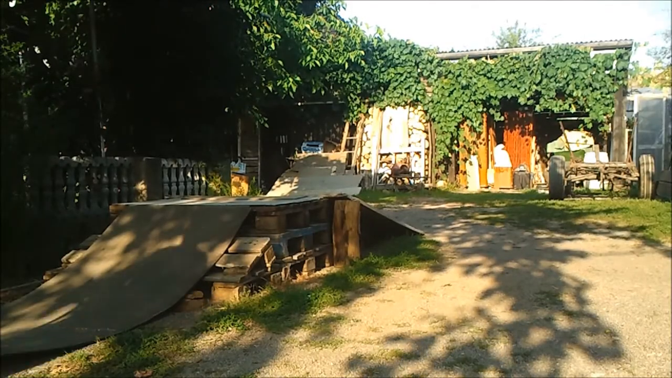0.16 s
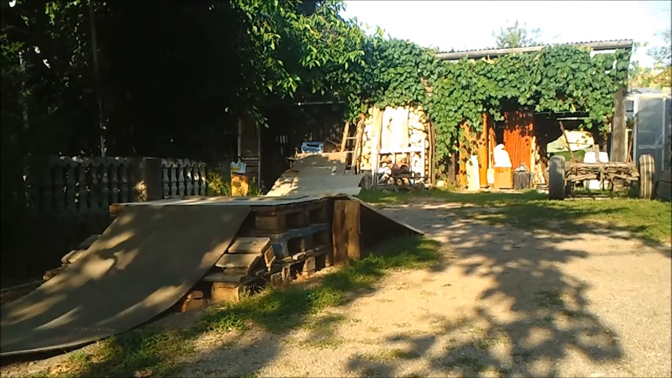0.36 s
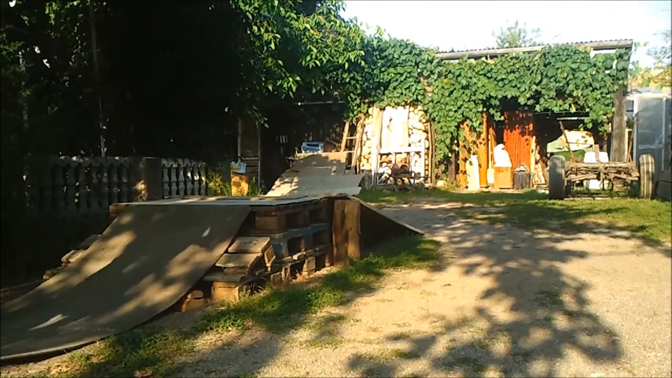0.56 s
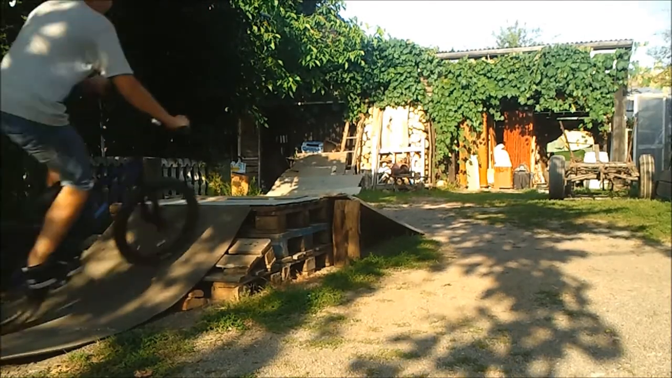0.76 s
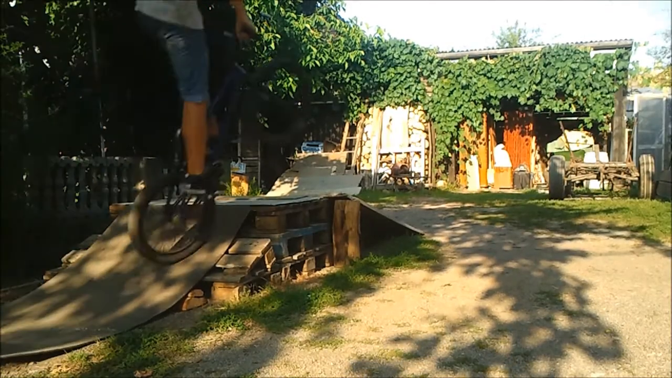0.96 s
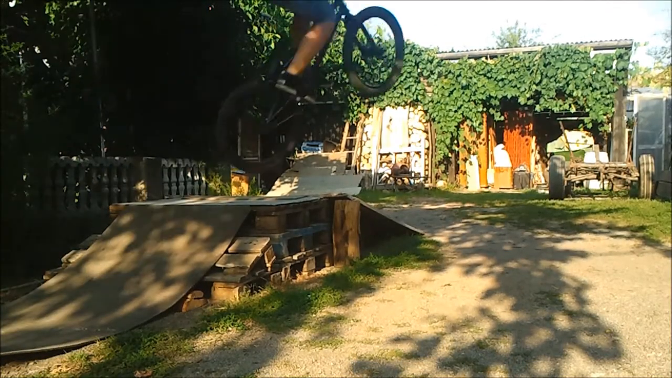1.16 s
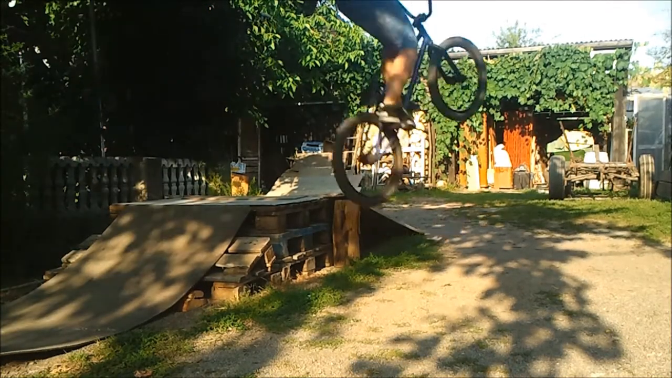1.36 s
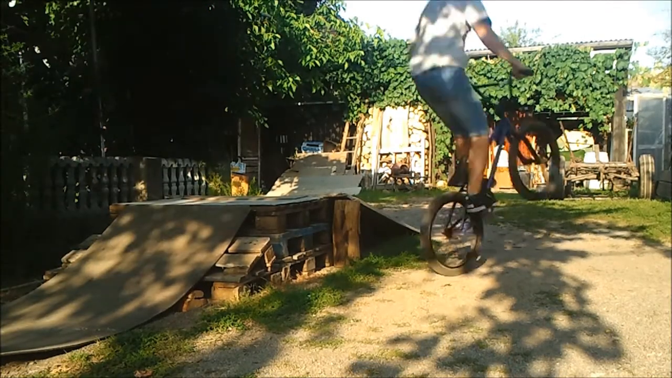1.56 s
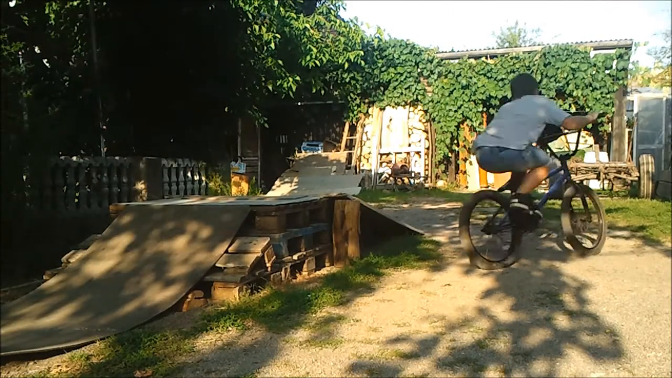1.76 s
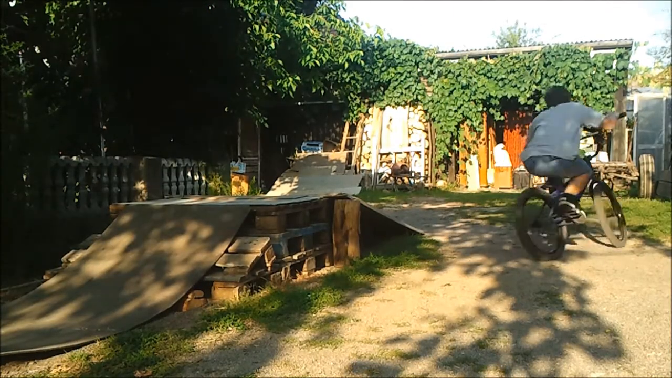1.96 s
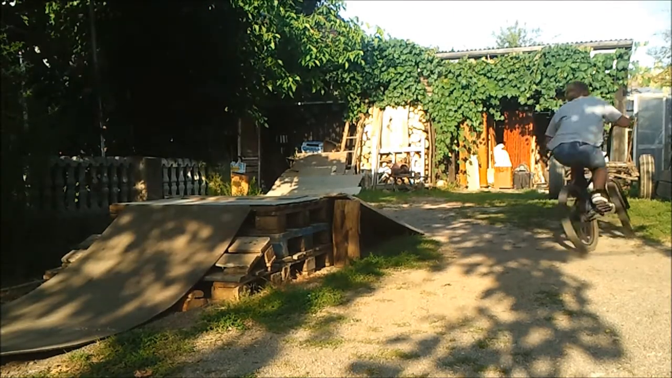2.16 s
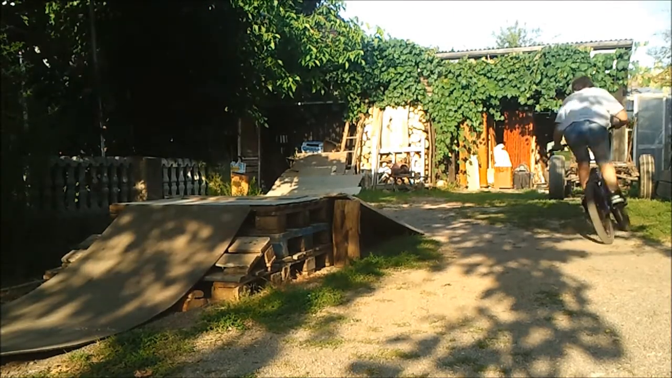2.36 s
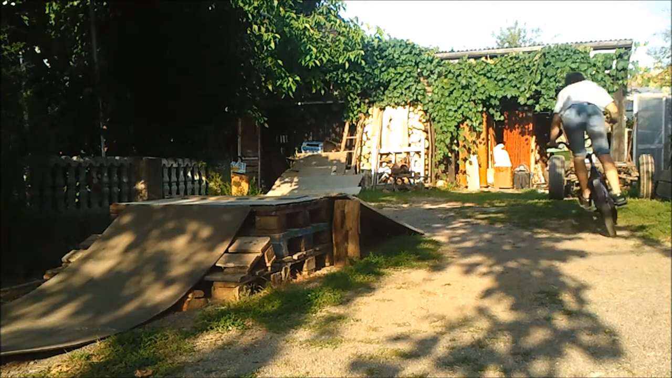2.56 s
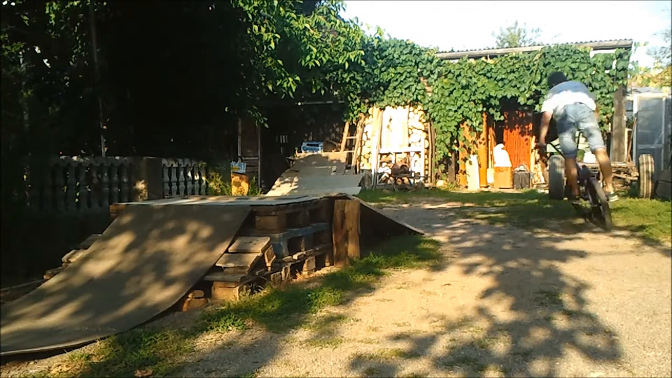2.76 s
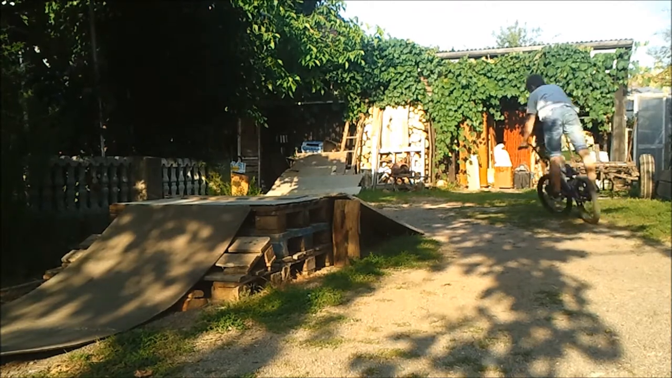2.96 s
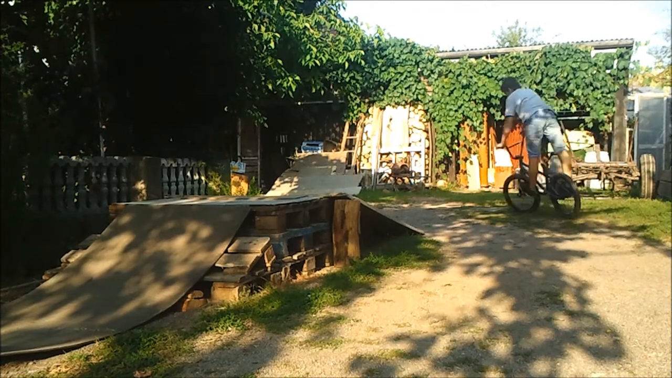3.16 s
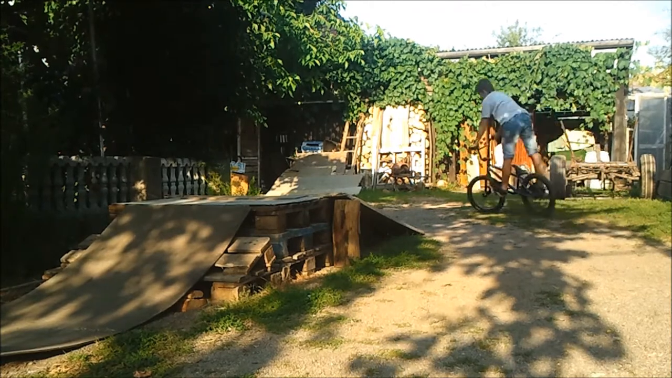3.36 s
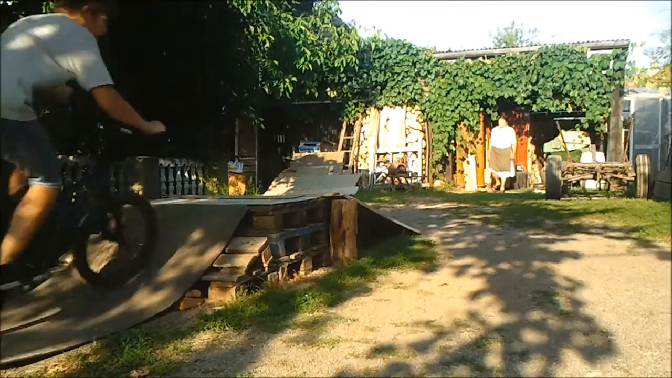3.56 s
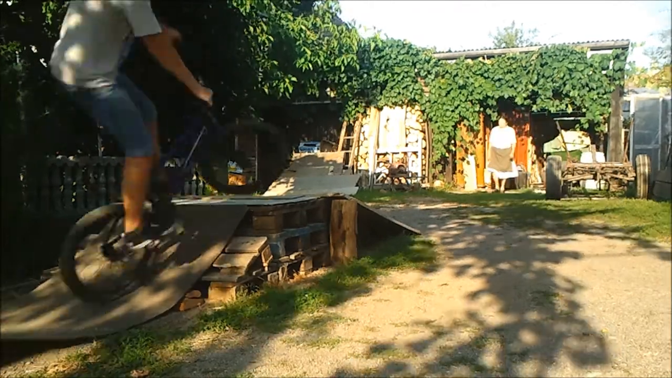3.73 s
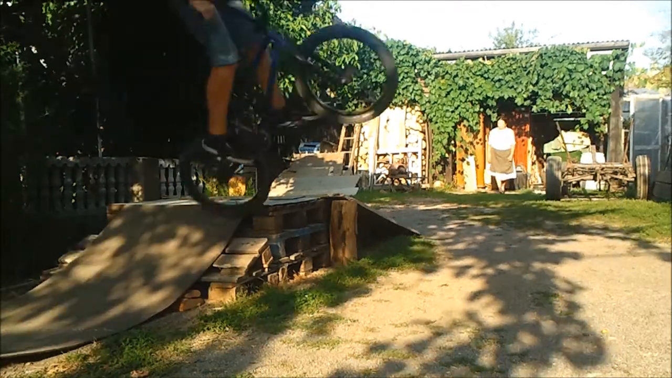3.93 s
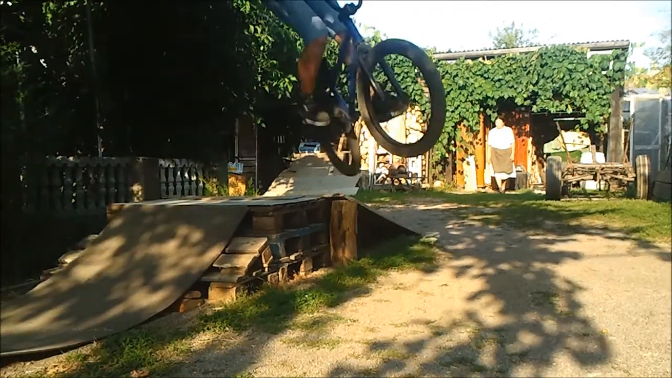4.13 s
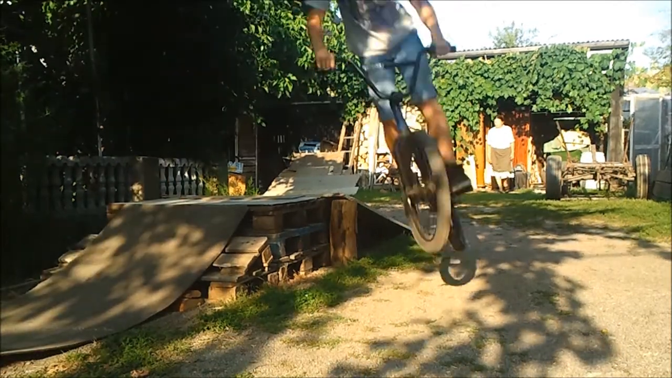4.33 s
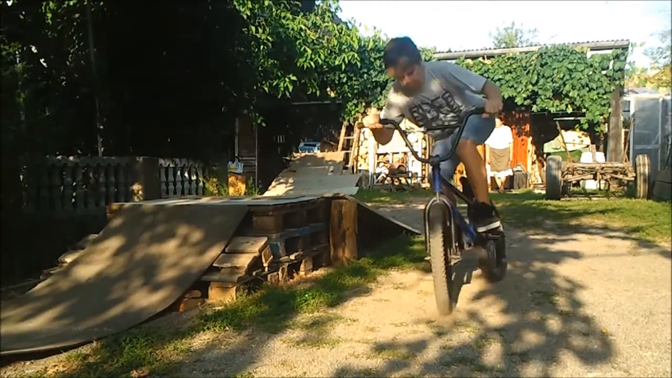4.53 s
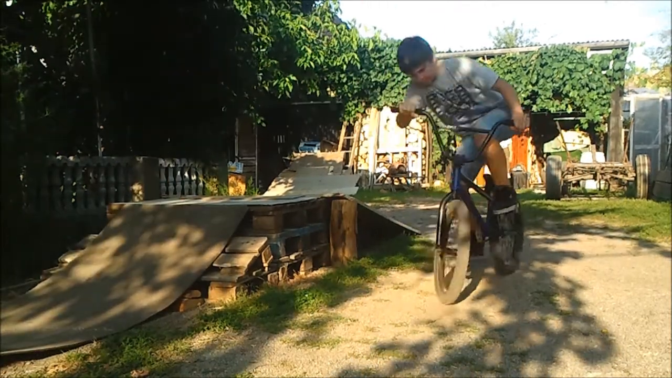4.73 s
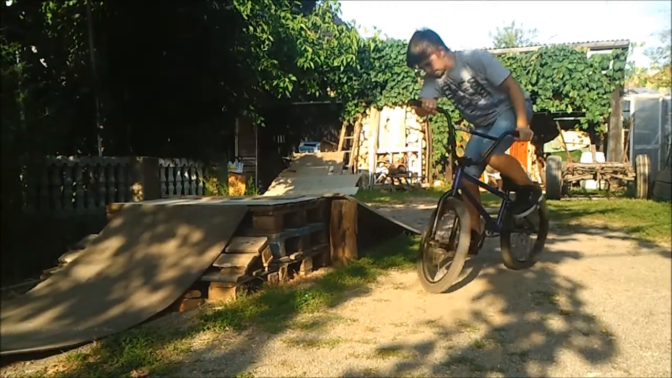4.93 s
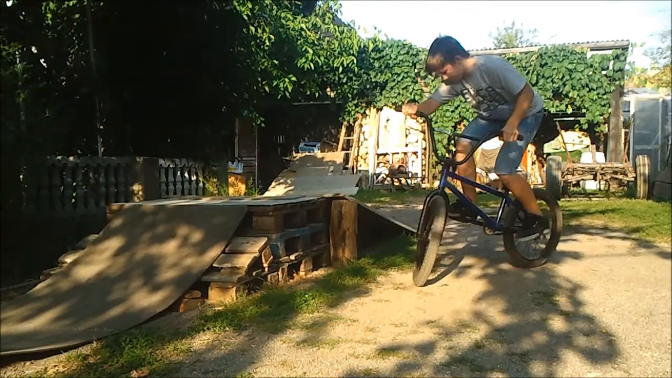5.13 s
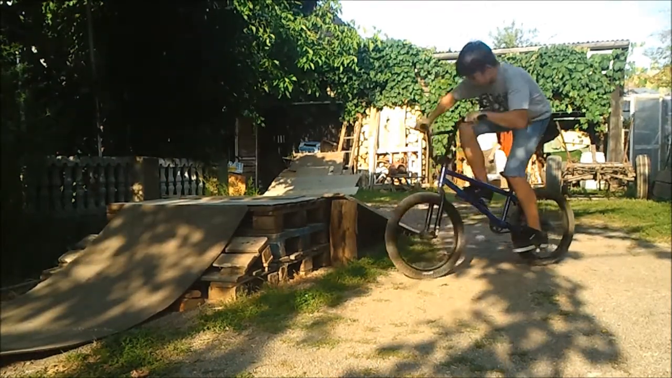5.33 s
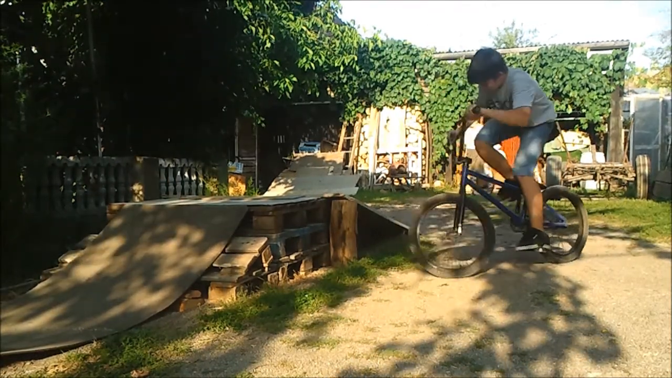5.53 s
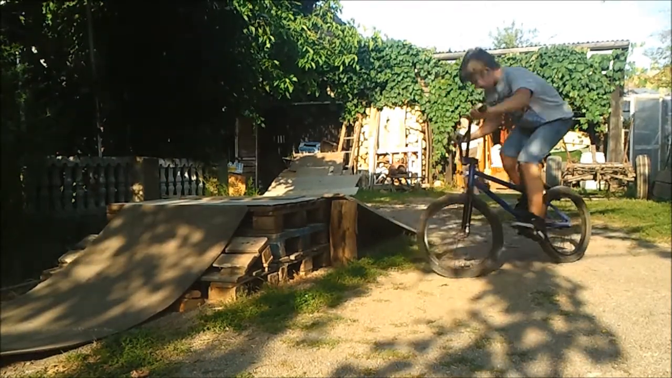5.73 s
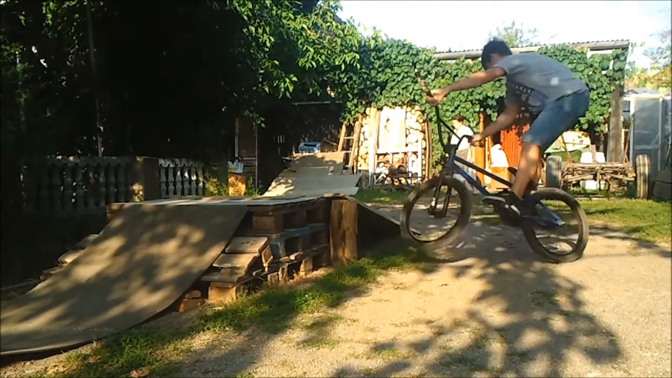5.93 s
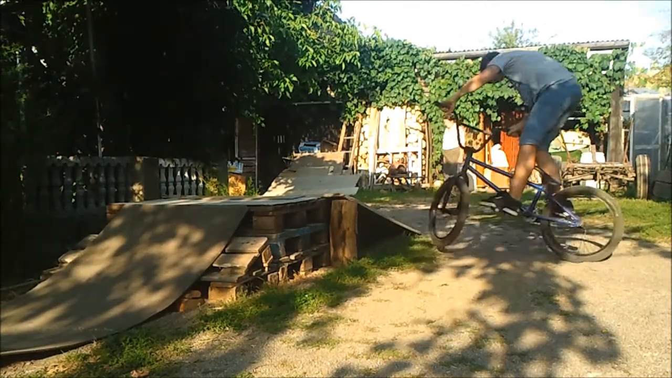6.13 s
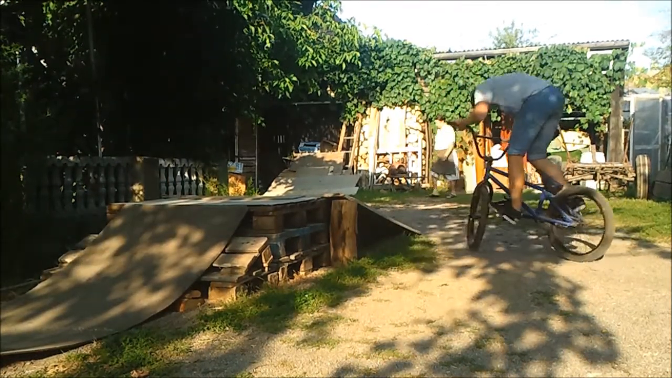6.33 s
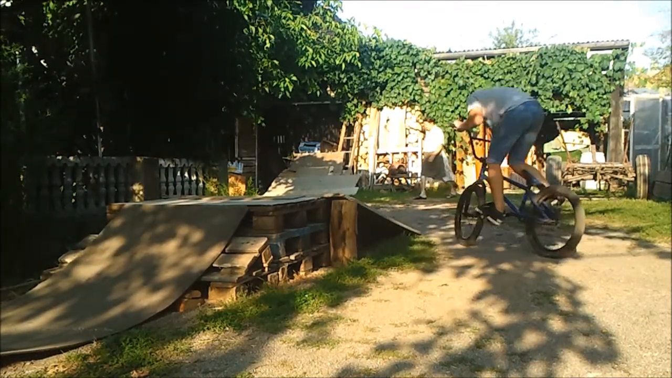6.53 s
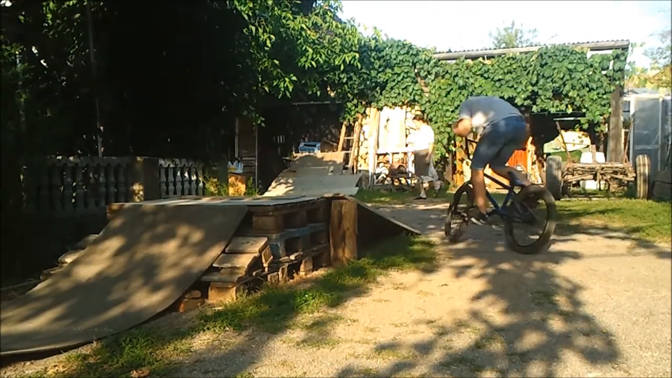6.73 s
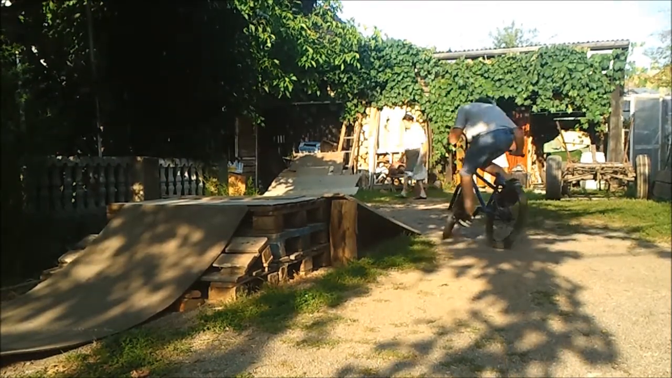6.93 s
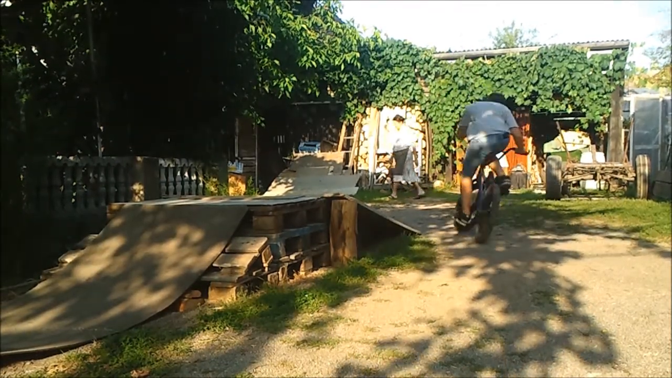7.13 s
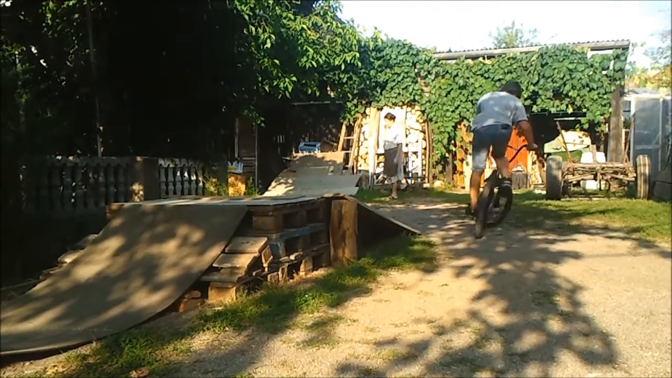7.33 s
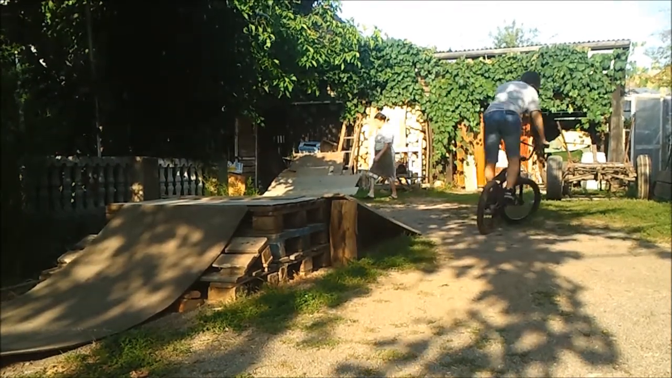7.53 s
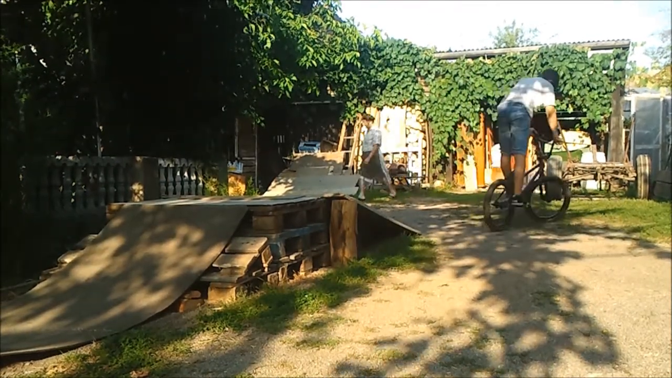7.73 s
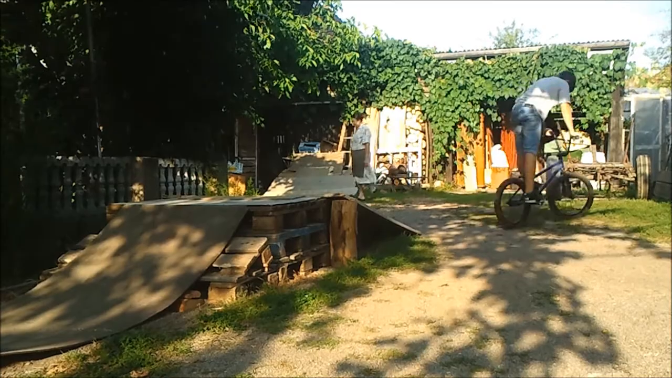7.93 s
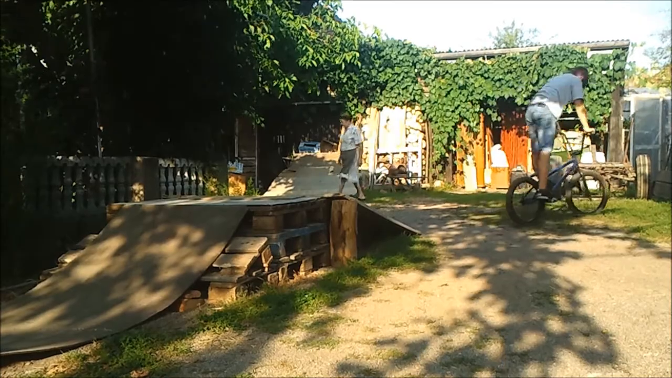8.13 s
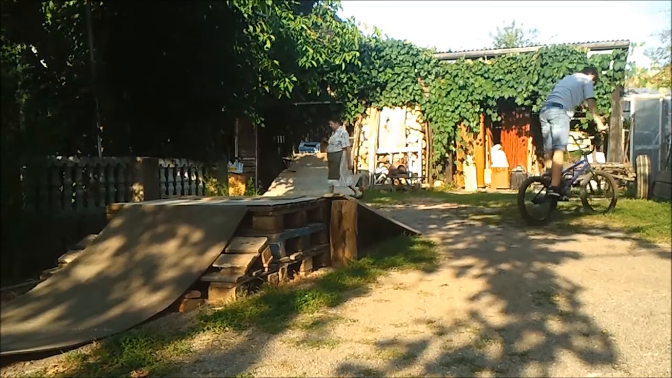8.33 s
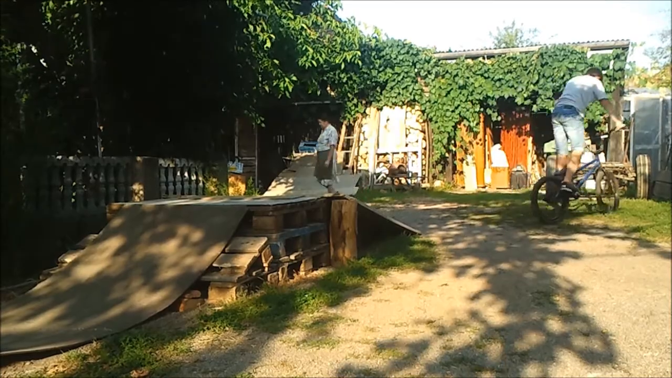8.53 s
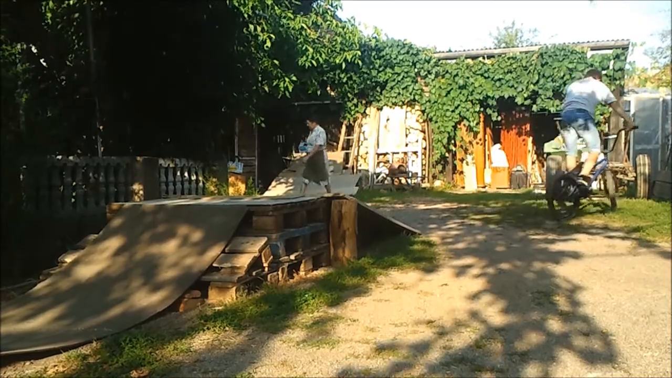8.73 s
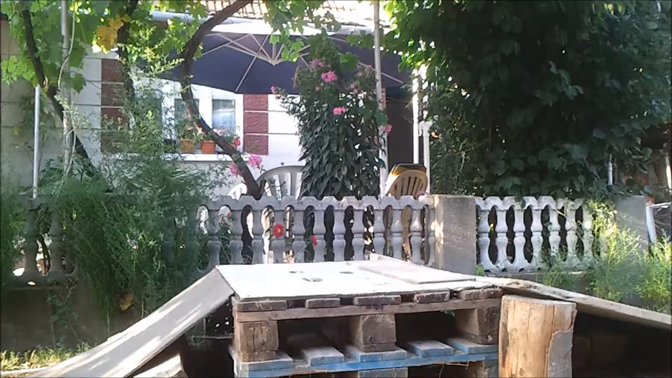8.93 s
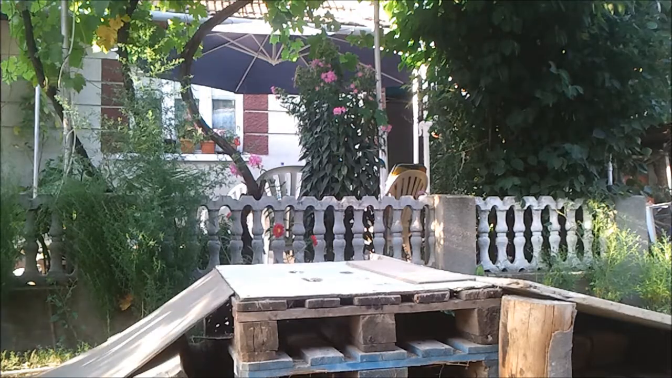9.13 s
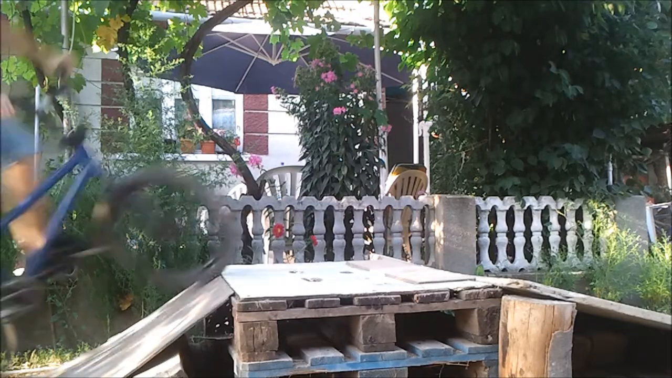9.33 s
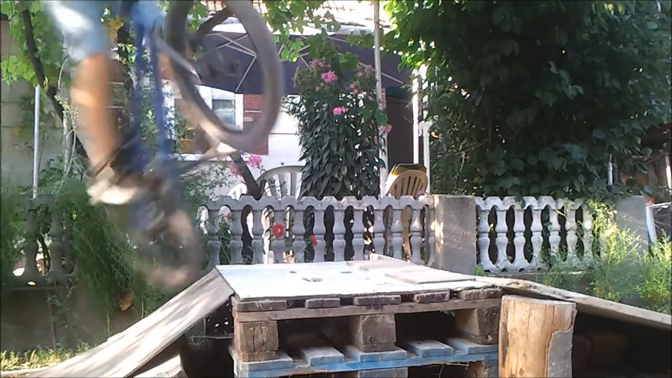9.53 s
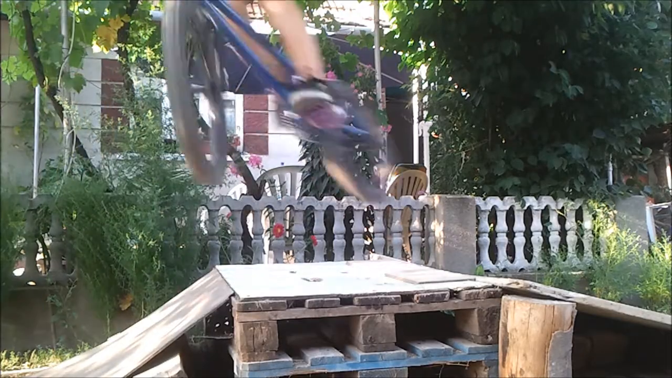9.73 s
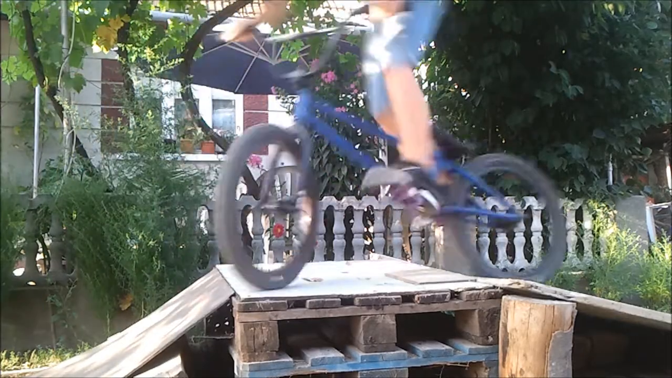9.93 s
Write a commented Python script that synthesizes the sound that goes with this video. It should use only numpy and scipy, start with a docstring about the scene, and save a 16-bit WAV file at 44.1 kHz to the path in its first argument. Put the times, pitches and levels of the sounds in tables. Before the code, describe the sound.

Three bicycle passes over a homemade plank ramp, heard close in the open air with a short soft reflection. Each begins with grinding tyres and snapping stones, then heavy hollow board knocks and loose slat rattle. Between rides come landing scuffs, metallic freewheel clicks slowing with the bike, small skids, and soft low wind thumps, over a very faint leafy rustle. The last pass slams loudest.

```python
"""A yard in the wind: a bicycle rolls over gravel and up a hollow plank ramp, three times.
Noise bursts and random impacts ring banks of resonances: boards drum and knock, freewheel ticks jangle.
Shaped grains of noise make the crunch of the tyres, short filtered cracks the snapping stones.
A few decaying sines ping like small steel parts. Lumpy low noise is the wind on the microphone, with the
ramp's low boom and the thud of landings; single low thumps and a faint steady rustle join it."""
import sys
import numpy as np
from scipy import signal
from scipy.fft import rfft, irfft, next_fast_len
from scipy.io import wavfile
from scipy.ndimage import map_coordinates

SR = 44100
rng = np.random.default_rng(int(sys.argv[2]) if len(sys.argv) > 2 else 0)


def transcribe(signal):
    """Save signal, clipped to [-1, 1], as a 16-bit WAV file at the path in sys.argv[1]."""
    frames = np.atleast_2d(signal).T
    limited = np.clip(frames, -1, 1)
    pcm = np.round(limited * 32767).astype(np.int16)
    wavfile.write(sys.argv[1], SR, pcm)


N = 440118  # length [samples]

# Wheels on the ramp, one table per ride: (time [s], drumming level [dB], rattle relative to drumming [dB])
RAMP_RIDES = [
    [(.3, -46, -6), (.69, -34, -4), (.72, -23, -13), (.9, -30, 1.5), (1.02, -18.5, -7.5), (1.2, -29, -5),
     (1.5, -38, -8.5)],
    [(3.555, -42, -11), (3.59, -29, -0.5), (3.68, -27, -4.5), (3.73, -21.5, -9.5), (3.9, -24.5, -2.5),
     (3.98, -21, -8), (4.16, -35, -0.5), (4.45, -46, -19)],
    [(8.95, -47, 1), (9.13, -22, -8), (9.29, -29, -3.5), (9.36, -17.5, -9), (9.62, -30, -2.5),
     (9.8, -28, -7), (9.97, -46, -5)],
]
# Knocks of boards and landings: (time [s], peak of the deck part [dB], slat part relative to it [dB])
BOARD_KNOCKS = [(0.706, -11.5, -4), (0.738, -22.5, -3.5), (0.879, -13, -6.5), (0.951, -12, 3.5),
                (0.975, -4, -6.5), (1.028, -5, -10.5), (1.048, -19, -18), (1.112, -18, 6),
                (1.127, -15.5, 5.5), (1.298, -15, -2.5), (1.929, -21, -7), (3.701, -10.5, -2.5),
                (3.739, -12.5, -16), (3.958, -7.5, -15.5), (3.977, -6, -22), (4.005, -5.5, -27),
                (4.13, -8, -14), (4.648, -14, 2), (4.675, -15.5, 8.5), (4.745, -20, -10), (6.504, -23.5, 5),
                (9.112, -14, -3.5), (9.302, -13, -3.5), (9.335, -0.5, 1.5), (9.403, -5, -7),
                (9.466, -9.5, -9), (9.53, -17, 0), (9.579, -14, 1), (9.645, -16, -17), (9.705, -15.5, 2),
                (9.73, -13.5, -5.5), (9.787, -17, -22)]
# Low resonances of the hollow plank deck: (centre [Hz], width [Hz], relative level [dB])
DECK_MODES = [(166.5, 49, -4.5), (232.5, 42, -3), (284.6, 21, 1), (388.7, 33, -5.5)]
# Higher resonances of the loose slats: (centre [Hz], width [Hz], relative level [dB])
SLAT_MODES = [(494, 62, 6.5), (657, 60, 5.5), (781, 69, -0.5), (1027, 143, -1.5), (1530, 1500, -16.5)]

# Steady rolling on grit, faint while the wheels are in the air or far off: (time [s], level [dB])
ROLLING_LEVEL = [(0, -26.5), (.33, -34), (.9, -34), (1.2, -52), (1.75, -50.5), (1.91, -41.5), (2.33, -41),
                 (3.55, -55.5), (3.6, -33.5), (3.89, -37), (4.05, -57), (4.6, -44.5), (4.9, -43),
                 (5.7, -41), (5.95, -51), (6.83, -48), (7.1, -44), (7.89, -49.5), (8.94, -51.5),
                 (9.0, -33.5), (9.28, -38), (9.59, -34), (9.97, -58)]
# Colour of the rolling crunch: (frequency [Hz], relative density [dB per Hz])
GRIT_COLOUR = [(180, -35), (300, -0.5), (534, -4), (888, -1), (1150, -2.5), (2260, -2.5), (7270, -7.5),
               (8000, -15)]
# A tyre lands, skids or scuffs and sprays grit: (time [s], spray level [dB], rise [s], hold [s])
TYRE_SCUFFS = [(0.09, -28.5, 0.028, 0.023), (0.39, -32, 0.016, .01), (0.478, -30.5, 0.029, 0.02),
               (0.582, -33, .03, 0.16), (0.967, -27.5, 0.068, 0.016), (1.287, -29.5, 0.029, 0.011),
               (1.799, -29, 0.003, 0.0077), (1.94, -30, 0.0068, 0.054), (4.091, -31.5, .02, 0.023),
               (4.644, -20.5, 0.0036, 0.011), (4.678, -20.5, .005, 0.015), (4.71, -26, 0.0071, 0.025),
               (6.014, -33.5, 0.07, 0.014), (6.2, -34.5, 0.045, 0.028), (6.326, -36, 0.087, 0.081),
               (6.486, -24, 0.012, 0.013), (6.61, -38, 0.026, 0.014), (7.609, -39.5, 0.04, 0.018),
               (9.337, -27, 0.01, 0.015), (9.403, -29, 0.0082, .02), (9.567, -32.5, 0.017, 0.013)]
# Coarse gravel sprayed aside, one row per stone size: (centre [Hz], width [Hz], relative level [dB])
SPRAY_MODES = [(840, 1080, 1), (2300, 540, -1.5), (3400, 3300, -4), (6900, 1900, -9)]
SCUFF_RISE_DB, SCUFF_FADE_DB_PER_S = 13.5, 155.5

# Stones snapping under the tyres: (time [s], peak level [dB], centre [Hz])
STONE_SNAPS = [(0.0736, -9.5, 2130), (0.091, -14, 2390), (.245, -13, 3000), (.276, -13.5, 1390),
               (0.392, -7.5, 2600), (0.4908, -4, 1980), (.595, -11, 2170), (1.2914, -6, 7000),
               (1.799, -22, 1310), (1.934, -4.5, 2420), (2.177, -14, 1590), (3.6297, -6, 6870),
               (3.8775, -12.5, 1270), (4.0605, -15, 1000), (4.647, -13, 1980), (4.677, 2.5, 2130),
               (4.69, -9, 2200), (4.7372, -9.5, 1110), (5.696, -19.5, 2730), (6.2024, -18, 2820),
               (6.226, -17, 6000), (6.296, -18.5, 2070), (6.311, -16.5, 1600), (6.343, -18, 2600),
               (6.359, -15, 1740), (6.4794, -18, 1530), (7.6021, -24, 1860), (8.9916, -15.5, 1500),
               (9.1806, -13, 1290), (9.3358, -0.5, 2630), (9.5284, -7, 2880), (9.708, 0.5, 6000)]

# Freewheel turning, one table per coast: (time [s], ratchet teeth passed so far [count])
COAST_TEETH = [
    [(.595, 0), (.965, 12), (1.254, 21), (1.44, 26), (1.552, 31), (1.778, 38), (1.869, 41), (2.186, 51),
     (2.565, 62), (2.79, 70), (2.994, 75), (3.529, 89)],
    [(3.585, 0), (3.805, 9), (4.257, 23), (4.503, 32), (4.623, 35)],
    [(4.893, 0), (5.189, 10), (5.429, 21), (5.655, 26), (5.799, 31), (5.915, 34), (6.072, 40)],
    [(7.437, 0), (7.497, 2), (7.823, 17), (7.91, 20), (7.95, 21), (8.056, 23), (8.204, 25), (8.415, 27),
     (8.554, 28), (8.668, 29)],
    [(8.95, 0), (9.289, 13), (9.475, 19), (9.615, 25), (9.853, 32), (9.959, 36)],
]
# Drive of the ticks into the hub: (time [s], relative level [dB])
TICK_LEVEL = [(.6, -20), (1, -16), (1.25, -21), (2.25, -21.5), (2.8, -29.5), (3.53, -28.5), (3.58, -17.5),
              (4.15, -17.5), (4.22, -26.5), (4.62, -19), (6.07, -23), (8.55, -28.5), (8.95, -22.5),
              (9.4, -17.5), (9.96, -20.5)]
# Jangling resonances of hub and spokes: (centre [Hz], width [Hz], relative level [dB])
HUB_MODES = [(2120, 230, -11.5), (3320, 1130, -11), (5342, 930, 0.5), (5684, 840, 1), (7270, 990, -2)]

# A small steel part is flicked: (time [s], starting level [dB])
STEEL_PINGS = [(2.003, -16), (9.72, -18.5), (9.8205, -18.5)]
PING_HZ, PING_T60 = 3620, .016  # pitch [Hz], time to fade by 60 dB [s]

# Low rumble: wind, with the ramp's low boom and the thud of landings: (time [s], level [dB])
RUMBLE_LEVEL = [(0, -32), (.52, -37.5), (1.01, -22), (1.3, -27), (1.6, -20.5), (1.65, -41.5), (1.9, -30),
                (1.95, -20.5), (2.25, -47), (2.9, -38.5), (3.55, -53), (3.7, -20.5), (4.16, -19.5),
                (4.48, -42), (4.68, -27), (4.91, -33.5), (5.17, -29), (5.95, -26.5), (6.19, -31.5),
                (6.61, -26.5), (6.76, -34.5), (7.39, -27.5), (7.63, -32), (8.92, -31.5), (8.95, -40),
                (9.4, -30.5), (9.97, -33.5)]
# Colour of the low rumble: (frequency [Hz], relative density [dB per Hz])
RUMBLE_COLOUR = [(8.8, -33), (15, -7), (38, 4), (60, 4.5), (172, -14.5), (215, -32), (350, -48),
                 (460, -61.5), (770, -120)]
# Single gust thumps on the microphone: (time [s], level of the sine before its window [dB], pitch [Hz])
GUST_THUMPS = [(1.49, -12.5, 51.6), (1.56, -13, 54.4), (1.606, -13, 69.6), (2.908, -20, 54.6),
               (4.138, -8, 79), (4.337, -19, 66.6), (5.187, -11, 71), (5.9, -20, 59.6), (5.928, -14.5, 125),
               (6.583, -14, 95), (6.978, -8.5, 97), (7.245, -16, 113), (7.361, -1.5, 107),
               (7.502, -15, 78.5), (7.986, -17.5, 101), (8.237, -18.5, 95), (8.401, -18.5, 54),
               (8.542, -19, 102), (8.657, -13.5, 49.4)]

# Colour of the far rustle: (frequency [Hz], relative density [dB per Hz])
YARD_COLOUR = [(88, -31), (150, 2), (819, -9), (951, -5.5), (1670, -23), (7000, -15), (8000, -17.5)]
# Frequency response of the microphone: (frequency [Hz], gain [dB])
MIC_RESPONSE = [(20, 1), (7600, 0.5), (8000, -10.5), (8300, -32.5), (8800, -62.5)]
TOP_HZ, OFFSET = 8882, .0199  # band limit [Hz], constant shift [full scale]


def ramp():
    """Loose boards chatter under the wheels and ring the hollow deck; single knocks stand out."""
    drum_gain, rattle_gain = np.zeros(N), np.zeros(N)
    for ride in RAMP_RIDES:
        drum_db, rattle_db = curves(ride)
        riding = curves([(ride[0][0], 1), (ride[-1][0], 1)], left=0, right=0)[0]
        drum_gain += riding * amp(drum_db)
        rattle_gain += riding * amp(drum_db + rattle_db)
    deck, slats = np.zeros(N), np.zeros(N)
    for size in (.88, 1.0, 1.13):  # three plank sizes sound together
        chatter = amp(4 * wobble(14)) * grains(150, 3, smooth=0.25)
        deck += filtered(chatter, board(DECK_MODES, size))
        slats += filtered(amp(2.5 * wobble(22)) * chatter, board(SLAT_MODES, size))
    track = drum_gain * unit(deck) + rattle_gain * unit(slats)
    for s, db, bright_db in BOARD_KNOCKS:
        size = np.exp(rng.normal(0, 0.058))
        blow = burst(0.13, 0.0019)
        blow[:24] += 0.8  # the first contact is one firm push
        clack = burst(0.088, 0.0003)
        boom = peak(filtered(blow, board(DECK_MODES, size)))
        snap = peak(filtered(clack, board(SLAT_MODES, size)))
        add(track, s, amp(db) * (boom + amp(bright_db) * snap))
    return track


def board(table, size):
    """No two planks are alike: modes fall in pitch as size grows and are unevenly excited."""
    uneven = [(hz, width, db + rng.normal(0, 3.8)) for hz, width, db in table]
    return lambda f: modes(uneven)(f * size)


def tyres():
    """Rolling rubber crushes grit in clumps; each scuff swells, holds and fades as a coarser spray."""
    clumps_db = 1.3 * wobble(30) + 1.5 * wobble(80)
    crunch = unit(filtered(grains(1200, 4.4, smooth=0.82), colour(GRIT_COLOUR)))
    # each size of stone has its own grains
    spray = unit(sum(filtered(grains(350, 3.5, smooth=0.4), modes([stone])) for stone in SPRAY_MODES))
    t, scuffing = np.arange(N) / SR, np.zeros(N)
    for s, db, rise, hold in TYRE_SCUFFS:
        before_db = SCUFF_RISE_DB * (s - t) / rise
        after_db = SCUFF_FADE_DB_PER_S * (t - s - hold)
        below_db = np.maximum(np.maximum(before_db, after_db), 0)
        scuffing = np.hypot(scuffing, amp(db - below_db))  # overlapping scuffs add in power
    rolling = amp(curves(ROLLING_LEVEL)[0])
    return amp(clumps_db) * (rolling * crunch + scuffing * spray)


def stones():
    """Each snap is a sharp crack with its own colour and a short scatter of grit after it."""
    track = np.zeros(N)
    for s, db, hz in STONE_SNAPS:
        crack = burst(0.003, .0001)
        scatter = amp(-10) * burst(0.065, 0.015)
        stone = modes([(hz, 1.4 * hz, 0)])
        snap = filtered(crack + scatter, lambda f: stone(f) ** 2)
        add(track, s, amp(db) * peak(snap))
    return track


def freewheel():
    """The pawl drops once for each ratchet tooth; hub and spokes jangle after it."""
    track = np.zeros(N)
    for coast in COAST_TEETH:
        s, teeth = np.transpose(coast)
        for when in np.interp(np.arange(teeth[-1] + 1), teeth, s):
            tick_db = np.interp(when, *np.transpose(TICK_LEVEL)) + rng.normal(0, 1.0)
            jangle = burst(0.16, 0.00047) + amp(-9.5) * burst(0.19, 0.0056)
            add(track, when, amp(tick_db) * jangle)
    return filtered(track, modes(HUB_MODES))


def pings():
    """A flicked steel part rings as one sine that dies away fast."""
    track, t = np.zeros(N), np.arange(SR // 8) / SR
    for s, db in STEEL_PINGS:
        add(track, s, amp(db - 60 * t / PING_T60) * np.sin(2 * np.pi * PING_HZ * t))
    return track


def walls(x):
    """House front and fence return a short, soft tail of decaying noise."""
    tail = burst(0.19, 0.0055)
    return signal.fftconvolve(x, tail / np.linalg.norm(tail))[:N]


def low_rumble():
    """Wind eddies shake the membrane in lumps and thumps; ramp boom and landing thuds swell the same noise."""
    rumble_db = curves(RUMBLE_LEVEL)[0]
    lumps = amp(4.4 * np.tanh(wobble(9.7)) + 3.9 * np.tanh(wobble(25) / 1.1))
    rumble = filtered(rng.standard_normal(N), colour(RUMBLE_COLOUR))
    flutter = filtered(rng.standard_normal(N), lambda hz: modes([(190, 130, 0)])(hz) ** 2)
    track = amp(rumble_db) * unit(lumps * rumble)
    # the higher flutter rises and falls more steeply than the rumble
    track += amp(1.535 * rumble_db - 5.0) * unit(lumps ** 2 * flutter)
    t = np.arange(SR // 5) / SR
    for s, db, hz in GUST_THUMPS:
        turns = hz * t
        swell = np.sin(np.pi * np.clip(turns / 1.205, 0, 1)) ** 2  # over after 1.205 cycles
        add(track, s, amp(db) * np.sin(2 * np.pi * turns) * swell)
    return track


def yard():
    """Leaves and far sounds: smooth coloured noise, nearly steady in level."""
    rustle = unit(filtered(rng.standard_normal(N), colour(YARD_COLOUR)))
    return amp(-51 + .8 * wobble(4.2)) * rustle


def amp(db):
    """Gain of a level in dB."""
    return 10 ** (np.asarray(db) / 20)


def unit(x):
    """x at rms 1."""
    return x / np.sqrt(np.mean(x ** 2) + 1e-20)


def peak(x):
    """x with its largest swing at 1."""
    return x / np.abs(x).max()


def colour(points):
    """Gain over frequency through (Hz, dB) points on a log frequency axis."""
    f, db = np.transpose(points)
    return lambda hz: amp(np.interp(np.log(hz + 1), np.log(f + 1), db))


def curves(rows, **outside):
    """One value per sample for each column after the time."""
    s, *cols = np.transpose(rows)
    return [np.interp(np.arange(N) / SR, s, c, **outside) for c in cols]


def wobble(rate):
    """A smooth random curve, rate knots a second."""
    knots = rng.standard_normal(int(N * rate / SR) + 4)
    return map_coordinates(knots, [np.arange(N) * rate / SR])


def filtered(x, response):
    """x times a complex response of frequency."""
    m = next_fast_len(len(x) + 8192)  # room for the ringing
    return irfft(rfft(x, m) * response(np.fft.rfftfreq(m, 1 / SR)), m)[:len(x)]


def modes(table):
    """Causal response of a set of resonances, with alternating sign."""
    def response(f):
        total = 0
        for k, (centre, width, db) in enumerate(table):
            damping = 1j * f * width
            total = total + (-1) ** k * amp(db) * damping / (centre ** 2 - f ** 2 + damping)
        return total
    return response


def grains(per_s, spread_db, smooth):
    """Sparse random impacts of uneven size mixed with a smooth share of noise, rms about 1."""
    size = amp(spread_db * np.minimum(rng.exponential(size=N), 2))
    hits = (rng.random(N) < per_s / SR) * rng.standard_normal(N) * size
    return np.sqrt(smooth) * rng.standard_normal(N) + np.sqrt(1 - smooth) * unit(hits)


def burst(t60, attack):
    """A puff of noise: attack time constant [s], then a decay of 60 dB per t60 [s]."""
    t = np.arange(SR // 4) / SR
    return rng.standard_normal(len(t)) * amp(-60 * t / t60) * (1 - np.exp(-t / attack))


def add(track, s, sound):
    """Mixes a sound in at time s."""
    part = track[round(s * SR):][:len(sound)]
    part += sound[:len(part)]


def scene():
    """All that reaches the microphone; the ramp's drumming and knocks, snaps and pings feed the walls."""
    hits = ramp() + stones() + pings()
    bicycle = hits + amp(-16.0) * walls(hits) + tyres() + freewheel()
    return (bicycle + low_rumble() + yard())[None]


def record(dry):
    """Loud peaks clip softly; the treble rolls off to the band limit; the converter sits off zero."""
    clipped = dry[0] / (1 + np.abs(dry[0] / .84) ** 6) ** (1 / 6)
    mic = colour(MIC_RESPONSE)
    return filtered(clipped, lambda hz: mic(hz) * (hz < TOP_HZ))[None] + OFFSET


dry = scene()
out = record(dry)
transcribe(out)
```